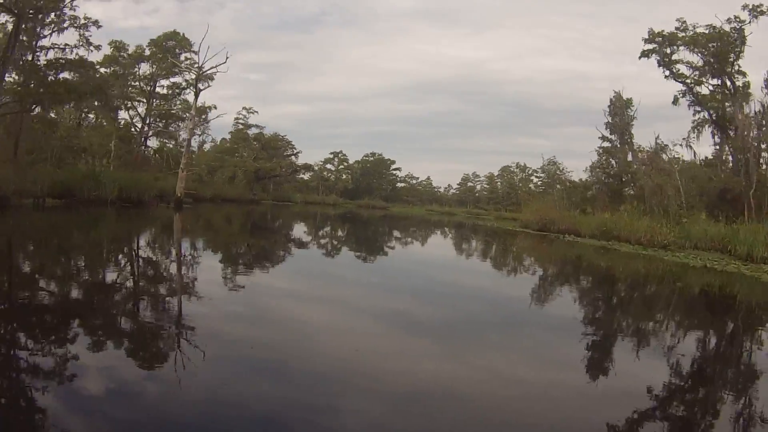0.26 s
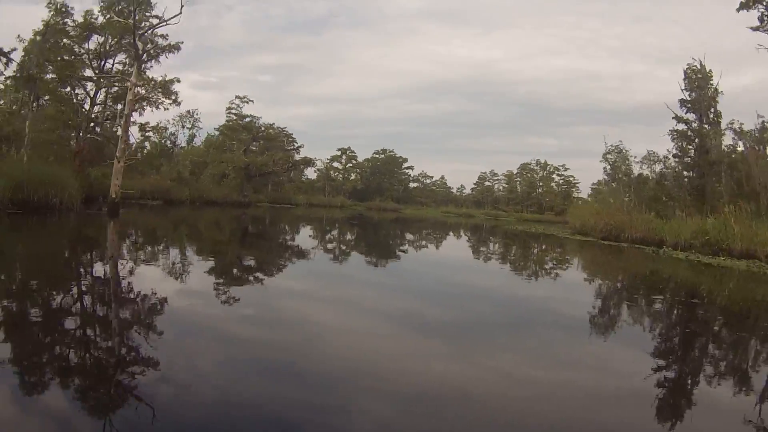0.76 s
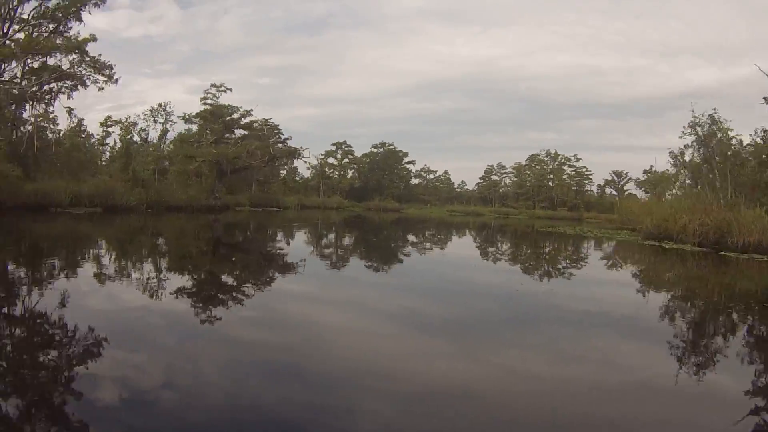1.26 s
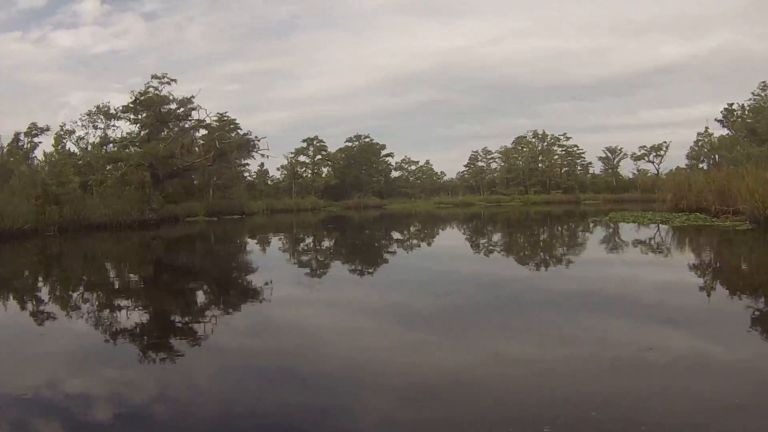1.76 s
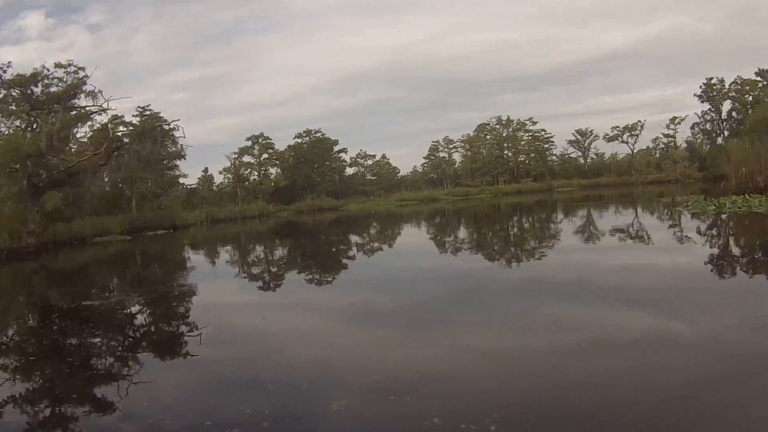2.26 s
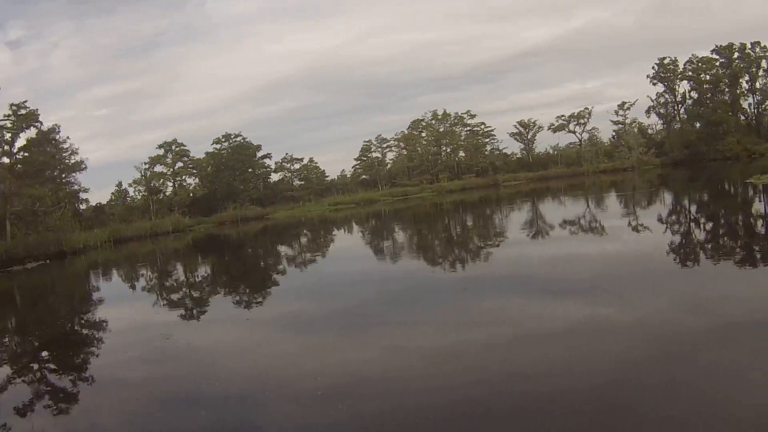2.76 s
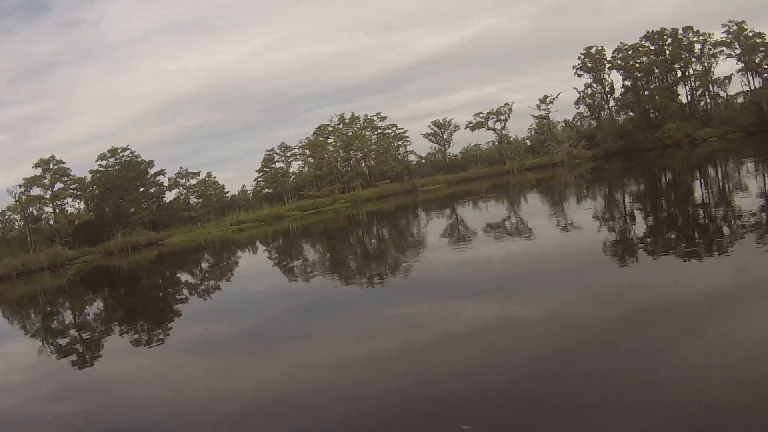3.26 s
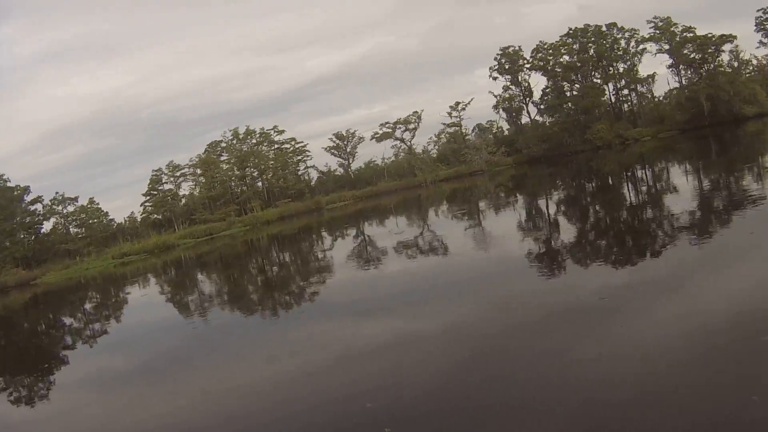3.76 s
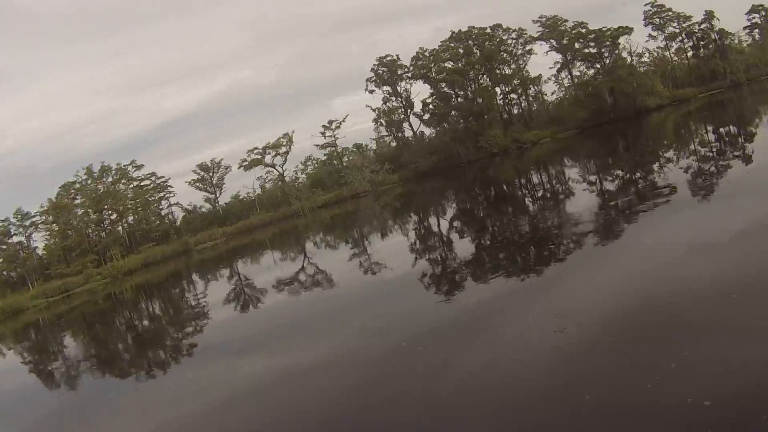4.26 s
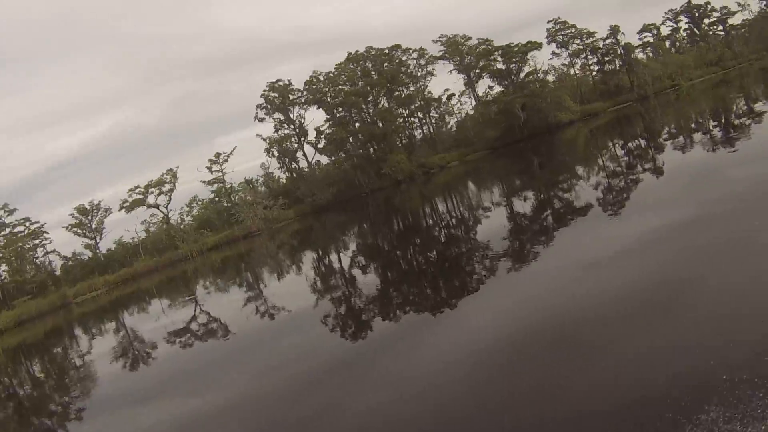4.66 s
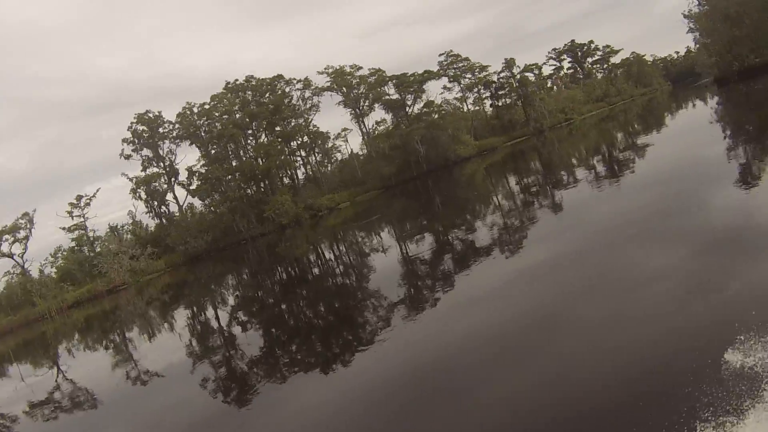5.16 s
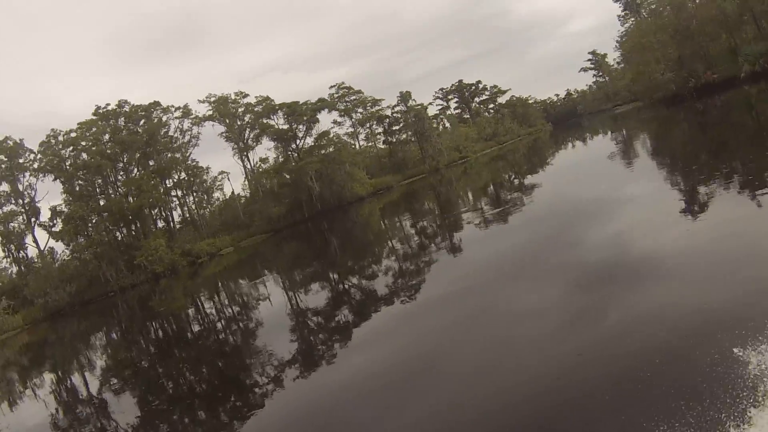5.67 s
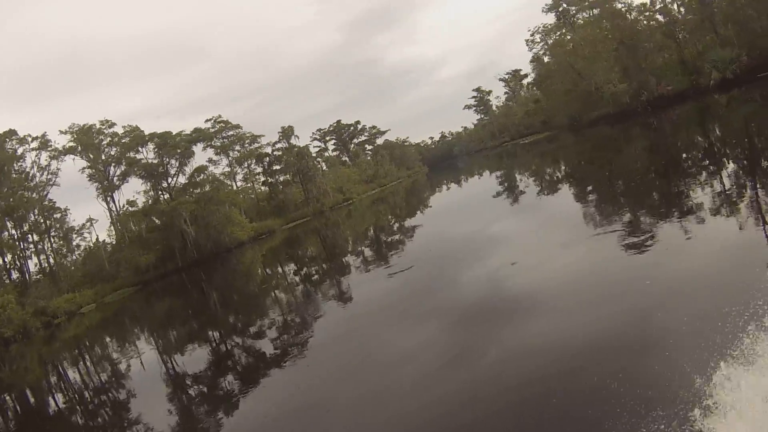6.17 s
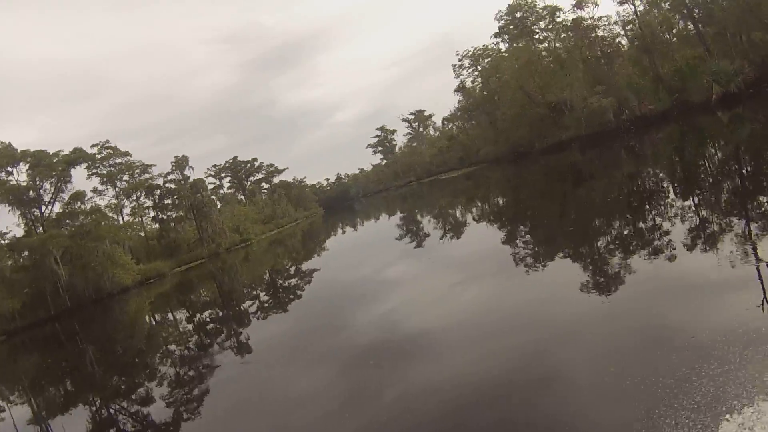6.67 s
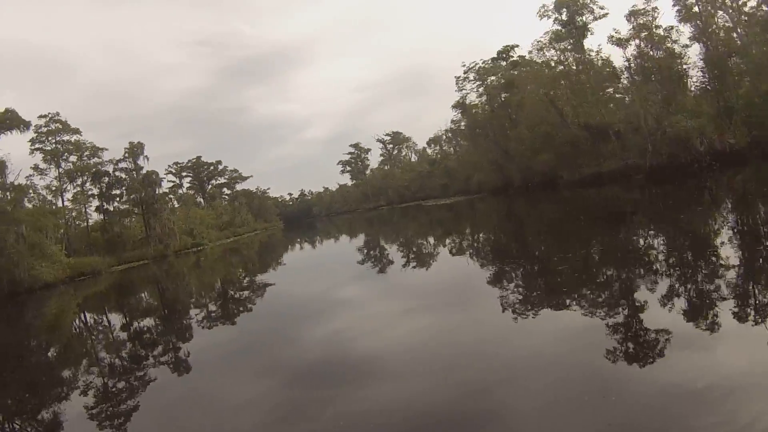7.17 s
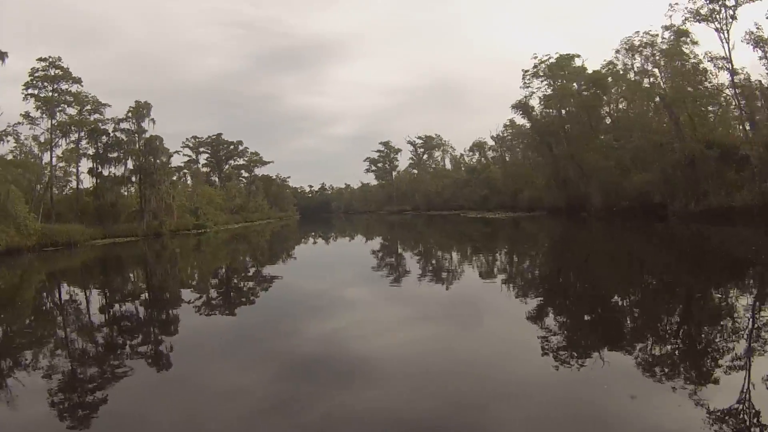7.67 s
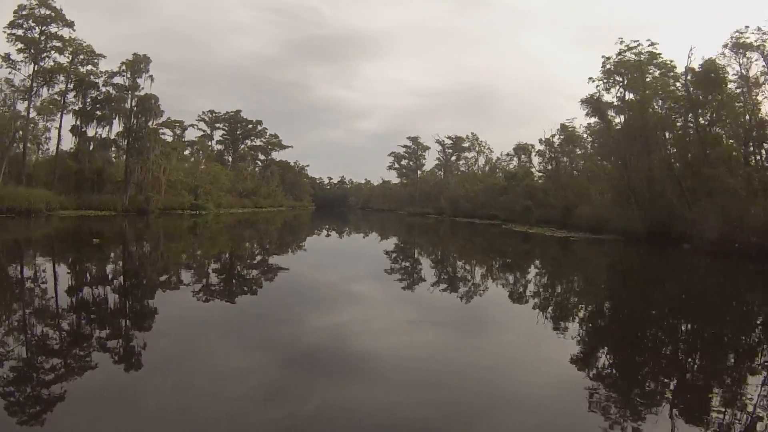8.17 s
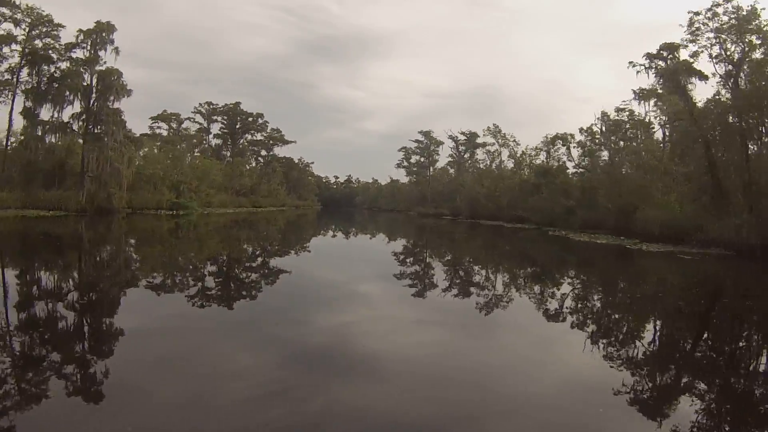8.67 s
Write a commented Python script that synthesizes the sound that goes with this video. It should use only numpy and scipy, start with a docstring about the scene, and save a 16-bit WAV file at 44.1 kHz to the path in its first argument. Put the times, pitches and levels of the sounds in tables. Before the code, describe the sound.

On board a small boat on an open, calm river, an outboard motor runs at steady throttle. A deep buzzing throb flutters briefly now and then beneath a dense midrange rattle of loose parts. Water rumbles under the hull, with small irregular bumps. Spray hisses more as the boat leans into a bend, then fades as it straightens. One close microphone on board, dry, with slightly coloured treble.

```python
"""On board a small boat on a calm river, driven by an outboard motor at steady throttle.
Tones locked to the firings make a deep throb that sags briefly now and then, with a drone of the hull.
Random clicks through resonances make a dense rattle with a few brief gaps and a thin buzz.
Shaped noise rumbles under the hull; fine clicks hiss as spray, most of all through a bend.
One microphone, whose case colours the treble, hears it all."""
import sys
import numpy as np
from scipy import signal
from scipy.fft import rfft, irfft, next_fast_len
from scipy.io import wavfile
from scipy.ndimage import uniform_filter1d, minimum_filter1d

SR = 44100
rng = np.random.default_rng(int(sys.argv[2]) if len(sys.argv) > 2 else 0)


def wav_out(sig):
    """Save sig, one row per channel (or a flat mono array), as 16-bit PCM at SR to the path in sys.argv[1]."""
    wavfile.write(sys.argv[1], SR, np.round(np.clip(np.atleast_2d(sig).T, -1, 1) * 32767).astype(np.int16))


N = 393372
TIME = np.arange(N) / SR  # s


def from_db(db):
    """Decibels to gain."""
    return 10 ** (np.asarray(db) / 20)


def rms_one(x):
    """Scale to unit rms."""
    return x / np.sqrt(np.mean(x ** 2) + 1e-20)


def in_time(rows):
    """Each column of a curve, joined by straight lines; the first column is the time in seconds."""
    s, *columns = np.transpose(rows)
    return [np.interp(TIME, s, column) for column in columns]


def bell(dt, width_s):
    """A smooth bump of height 1, this wide at half height."""
    return np.exp(-np.log(2) * np.minimum((2 * dt / width_s) ** 2, 50))


def drift(rate):
    """Slow chance with about this many turns a second; spread 1."""
    step = 40  # samples between the points of the slow noise
    settling = 2000  # points dropped while the filter settles
    r = np.exp(-2 * step * np.pi * rate / SR)
    noise = rng.standard_normal(N // step + 2 + settling)
    slow = signal.lfilter([1], [1, -2 * r, r * r], noise)[settling:]
    return np.interp(np.arange(N) / step, np.arange(len(slow)), rms_one(slow))


def coloured(x, spectrum):
    """Give a sound the colour of a spectrum table, joined by straight lines over log frequency; rms 1."""
    size = next_fast_len(N)
    hz, db = np.transpose(spectrum)
    bins = np.maximum(np.fft.rfftfreq(size, 1 / SR), 1)
    gain = from_db(np.interp(np.log(bins), np.log(hz), db))
    return rms_one(irfft(rfft(x, size) * gain, size)[:N])


def resonate(x, hz, width_hz):
    """One resonance with gain 1 on top."""
    r = np.exp(-np.pi * width_hz / SR)
    feed = np.array([1, 0, -1]) * (1 - r * r) / 2
    return signal.lfilter(feed, [1, -2 * r * np.cos(2 * np.pi * hz / SR), r * r], x)


def grains(per_s, spread_db):
    """Random clicks of uneven size and sign; rms 1."""
    sizes = from_db(spread_db * np.minimum(rng.exponential(1, N), 4))
    struck = rng.random(N) < per_s / SR
    return rms_one(struck * sizes * rng.choice([-1, 1], N))


def sag(slip_hz, lean):
    """In each sag the throb fades and slips out of step, then catches again more quickly."""
    # Placed sags of the throb, mostly deep. Each row: centre in seconds, depth from 0 to 1, width in seconds.
    placed_sags = [(0.058, .7, 0.071), (0.204, 0.3, 0.091), (0.495, 0.36, 0.12), (0.975, .6, 0.084),
                   (1.505, 0.56, 0.071), (1.663, .45, .11), (2.464, .74, .12), (2.821, 0.5, .05),
                   (3.196, 0.7, .14), (4.47, 0.9, 0.075), (4.729, .9, 0.068), (5.784, .67, 0.15),
                   (6.606, 1, .043), (7.195, 0.76, .035), (8.005, 1, 0.059), (8.134, 0.7, 0.076),
                   (8.422, 0.96, 0.041)]
    # further brief ones come by chance, one in each slot; depth and width are averages
    dips_per_s, dip_depth, dip_width_s = 4, 0.38, 0.042
    dips = []
    for slot, (when, deep, long) in enumerate(rng.random((60, 3))):
        dips.append(((slot + when) / dips_per_s, dip_depth * (.5 + deep), dip_width_s * (.5 + long)))
    gain = np.ones(N, complex)
    for s, depth, width in list(placed_sags) + dips:
        near = slice(max(int((s - 3 * width) * SR), 0), int((s + 3 * width) * SR))
        dt = TIME[near] - s
        # wider before the centre than after it
        fade = bell(dt, width * (1 - min(lean, .6) * np.sign(dt)))
        gain[near] *= 1 - min(depth, 1) * fade * np.exp(-2j * np.pi * slip_hz * dt)
    return gain


def drone_gain():
    """The hull's drone builds, slowly ebbs or grows, and drops back to its resting level."""
    # Swells added to the resting drone. Each row: full swell in seconds, release in seconds,
    # level in dB at full swell, ebb in dB per second (below zero it grows).
    swells = [(0.502, 1.97, -36, -3), (2.167, 4.15, -19.5, 4.7), (7.648, 9.0, -23.5, -5.5)]
    rest_db, rise_s, release_s = -32, 0.22, 0.11
    gain = from_db(rest_db)
    for full, release, db, ebb in swells:
        rise = 1 + (TIME - full) / rise_s
        fall = 1 - (TIME - release) / release_s
        gate = np.clip(np.minimum(rise, fall), 0, 1)
        gain = gain + gate * from_db(db - ebb * np.clip(TIME - full, 0, release - full))
    return gain


def engine(phase, load, bend, throb_rough, drone_rough, overtone_rough):
    """Tones locked to the firings; their strength wanders slowly."""
    # Firing tone. Each row: time in seconds, level in dB.
    throb_curve = [(0, -13), (1.2, -10), (2.6, -14.5), (3.7, -14.5), (4.8, -12), (6.9, -11.5), (8.9, -15)]
    # Weaker tones. Each row: multiple of the firing rate, level in dB when running straight at no load,
    # dB added by full load, dB added by full lean.
    weaker_tones = [(.5, -54.5, 7.5, 1.5), (1.5, -39, 4.5, 0.5), (2, -34, 0, 5.5), (4, -42, -3, -2.5),
                    (5, -51.5, 3.5, -1), (6, -41, 0.5, -5.5), (7, -53.5, 6, -5), (8, -46, 7, 4),
                    (9, -41.5, 3.5, -1), (11, -44.5, 3.5, -4), (12, -44, 9.5, 8)]
    firing_level, = in_time(throb_curve)
    throb = np.real(sag(slip_hz=4.6, lean=0.52) * np.exp(1j * phase)) * (1 + throb_rough * drift(5.9))
    # the drone, at three times the firing rate, opposes the throb at its crests and flattens them
    drone = -np.cos(3 * phase + drone_rough * drift(8)) * (1 + drone_rough * drift(8))
    out = from_db(firing_level) * throb + drone_gain() * drone
    for multiple, db, load_db, bend_db in weaker_tones:
        wander = 1 + overtone_rough * (drift(3.8) + 1j * drift(6))
        turning = np.exp(1j * (multiple * phase + 2 * np.pi * rng.random()))
        out += from_db(db + load_db * load + bend_db * bend) * np.real(wander * turning)
    return np.sqrt(2) * out  # a steady tone's level is then its rms


def ripples():
    """dB of surge as the water shakes the hull harder: single ripples on a light chop."""
    # Ripples met by the hull. Each row: peak in seconds, surge in dB, length in seconds at half height.
    ripples_met = [(0.583, 7.5, 0.098), (1.024, 6.5, 0.025), (1.62, 4, 0.25), (2.17, 4.5, 0.15),
                   (3.34, 5, 0.23), (4.113, 5, 0.064), (4.58, 4, 0.14), (4.862, 3.5, 0.22),
                   (5.825, 5.5, 0.033), (6.217, 2.5, .18), (6.64, 2.8, 0.096), (6.937, 3, 0.12),
                   (7.485, 4, 0.023), (8.16, 5.5, 0.027), (8.424, 3.1, .04), (8.724, 5, 0.085)]
    chop_db, chop_per_s = 1.5, 7.5  # smaller ripples come by chance
    single = sum(db * bell(TIME - s, length) for s, db, length in ripples_met)
    return single + chop_db * drift(chop_per_s)


def gaps(flight_s, flight_db, settle_s):
    """dB added to the rattle: the parts lift off for an instant, return stronger or softer, then even out."""
    # Brief gaps in the rattle. Each row: return in seconds, dB added at the return (below zero softer).
    returns = [(0.883, 0.5), (0.99, 7), (1.378, 1.5), (1.421, 3.5), (1.473, -1.5), (4.181, -1), (4.753, 4),
               (8.146, 2), (8.412, 0.5), (8.707, 2)]
    out = np.zeros(N)
    for s, db in returns:
        dt = TIME - s
        out += flight_db * ((dt > -flight_s) & (dt < 0))
        out += db * (dt >= 0) * np.exp(-np.abs(dt) / settle_s)
    return out


def buzz(phase, in_step, fade_s):
    """Tiny parts tick, a little more on every firing, and ring high; each comes loose, then seats again."""
    # Loose parts. Each row: start in seconds, end in seconds, resonance in Hz,
    # width in Hz of each of two passes, level in dB relative to the rattle.
    loose_parts = [(-.5, 1.2, 6500, 500, -38), (.6, 1.85, 6830, 260, -42), (7.85, 9.4, 5560, 320, -45)]
    out = np.zeros(N)
    for start, end, hz, width, db in loose_parts:
        loose = np.clip(np.minimum(TIME - start, end - TIME) / fade_s, 0, 1)
        ticks = grains(4000, spread_db=-4.5) * (1 + in_step * np.cos(phase))
        ringing = rms_one(resonate(resonate(ticks, hz, width), hz, width))
        out += from_db(db) * loose * ringing
    return out


def rattle(phase, shake_db, contacts_per_s, in_step, flutter_db, ring_db, clatter_db, fizz_db):
    """Loose parts chatter, a little more on each firing: a ringing body and a dry, bright clatter."""
    # Resonances of the parts. Each row: centre in Hz, width in Hz of each of two passes, relative dB.
    part_modes = [(489, 76, -18), (612.5, 54, -9), (690, 59, -5.5), (769.7, 56, 1), (819, 59, 0.5),
                  (878, 70, -1), (970.7, 119, 3), (1034.7, 59, 0.5), (1102, 69, -2), (1374, 135, -12),
                  (1580, 280, -16.5), (1888, 230, -18), (2214, 350, -27.5)]
    # Colours of the clatter and of the fizz above it. Each row: frequency in Hz, relative dB per Hz.
    clatter_colour = [(300, 1.5), (700, 0), (1100, -4), (1230, -2), (1400, 0), (1800, -2.5), (2500, -9),
                      (3150, -8), (3900, -15), (4400, -25.5), (6500, -30), (9000, -38), (12000, -51.5),
                      (15000, -55.5)]
    fizz_colour = [(4000, -19.5), (8000, -3), (11000, 2.5), (12100, -9), (12900, 0), (13900, -6.5),
                   (15000, -14.5)]
    base_db = -24.5  # at light load
    uneven_db = flutter_db * drift(44) + gaps(flight_s=0.0091, flight_db=-5.0, settle_s=0.0083)
    force = from_db(uneven_db) * (1 + in_step * np.cos(phase))
    ring = np.zeros(N)
    # each resonance acts twice, which keeps the valleys between them dark
    for hz, width, db in part_modes:
        contacts = force * grains(contacts_per_s, spread_db=1.5)
        ring += from_db(db) * resonate(resonate(contacts, hz, width), hz, width)
    ringing = from_db(ring_db) * rms_one(ring) + buzz(phase, in_step=0.23, fade_s=0.28)
    clatter = coloured(force * grains(9000, spread_db=2.0), clatter_colour)
    # a faint fizz at the top of the treble, brightest in the loudest rattle
    fizz = coloured(force * grains(2500, spread_db=4.5), fizz_colour)
    out = from_db(shake_db) * ringing
    out += from_db(clatter_db + 0.61 * shake_db) * clatter
    out += from_db(fizz_db + 1.8 * shake_db) * fizz
    return from_db(base_db) * out


def water(phase, load, bend, surge_db, patchy_db, in_step):
    """The hull rumbles over the water and throws droplets and a fine mist in uneven spurts."""
    # Colours of rumble, droplets and mist. Each row: frequency in Hz, relative dB per Hz.
    rumble_colour = [(20, -23.5), (45, -11.5), (70, 9), (100, 8), (135, 1), (185, -3), (240, 4),
                     (275, -2.5), (310, -13.5), (420, -17.5), (600, -24), (1200, -19), (2500, -62)]
    spray_colour = [(600, -7), (1600, -5.5), (2550, -14), (3150, 5), (3500, -1), (3780, 4), (4000, -3),
                    (4350, -16), (5200, -20), (6500, -22.5), (9000, -33), (12000, -46.5), (15000, -63)]
    mist_colour = [(3000, -31.5), (5000, -2), (6400, 2), (8200, -1), (9300, -10), (10900, -8),
                   (11700, -17.5), (15000, -33.5)]
    # Finest mist of the spray. Each row: time in seconds, level in dB.
    mist_curve = [(0, -60.5), (2.5, -58), (4.6, -55), (7.5, -70), (8.9, -65)]
    rumble_base_db, rumble_load_db = -25.5, 1.6  # at light load, and what full load adds
    spray_base_db, spray_bend_db = -47, 13.5  # on a straight course, and what the full lean adds
    rumble_follows, spray_follows, mist_follows = .7, 0.76, .6  # dB per dB of surge
    mist_level, = in_time(mist_curve)
    rumble_db = rumble_base_db + rumble_load_db * load + rumble_follows * surge_db
    spray_db = spray_base_db + spray_bend_db * bend + spray_follows * surge_db
    mist_db = mist_level + mist_follows * surge_db
    rumble = from_db(rumble_db) * coloured(rng.standard_normal(N), rumble_colour)
    spray = from_db(spray_db) * coloured(grains(14000, spread_db=2.0), spray_colour)
    mist = from_db(mist_db) * coloured(grains(12000, spread_db=3.5), mist_colour)
    # the hull shivers with the engine, so the spray pulses faintly
    shiver = 1 + in_step * np.cos(phase)
    return rumble + (spray + mist) * from_db(patchy_db * drift(2.1)) * shiver


def scene():
    """Engine, rattle and water at one microphone on board."""
    # Engine speed. Each row: time in seconds, firings per second.
    speed_curve = [(0.1, 85.0), (0.5, 83.7), (2.2, 83.8), (2.9, 84.5), (3.3, 85.6), (5.2, 85.8),
                   (6.1, 86.4), (7.0, 87.1), (7.6, 86.7), (8.0, 85.7)]
    # Load on the boat, which steps up in the bend. Each row: time in seconds, share from 0 to 1.
    load_curve = [(0, 0.37), (1.3, 0.13), (3.9, 0), (4.55, 0.83), (5.3, 0.93), (6.5, 0.79), (8.9, 0.94)]
    # How far the boat leans into the bend. Each row: time in seconds, share from 0 to 1.
    bend_curve = [(0, 0.05), (1.4, 0.1), (3.1, 0.73), (4.6, 0.95), (5.4, .76), (7.0, 0.52), (7.9, 0.18),
                  (8.9, 0)]
    rattle_load_db, rattle_follows = 3.5, 0.83  # dB added by full load, dB per dB of surge
    firings_per_s, = in_time(speed_curve)
    load, = in_time(load_curve)
    bend, = in_time(bend_curve)
    surge_db = ripples()
    # the firing rate wavers slightly
    phase = 2 * np.pi * np.cumsum(firings_per_s * (1 + .002 * drift(7))) / SR
    tones = engine(phase, load, bend, throb_rough=0.027, drone_rough=0.21, overtone_rough=0.22)
    shake_db = rattle_load_db * load + rattle_follows * surge_db
    shaken = rattle(phase, shake_db, contacts_per_s=3500, in_step=0.12, flutter_db=0.3,
                    ring_db=-1.65, clatter_db=-10.0, fizz_db=-55.5)
    wet = water(phase, load, bend, surge_db, patchy_db=0.65, in_step=0.033)
    return (tones + shaken + wet)[None]


def limiter(x, top):
    """The gain ducks smoothly around every peak that would pass the top."""
    size = SR // 250  # 4 ms
    gain = minimum_filter1d(np.minimum(1, top / (np.abs(x) + 1e-9)), 2 * size)
    return x * uniform_filter1d(uniform_filter1d(gain, size), size)


def record(dry):
    """The microphone's case colours the treble, peaks are held down, the top is cut."""
    # Resonances of the case. Each row: centre in Hz, width in Hz, boost in dB (below zero a dip).
    case_modes = [(4420, 140, 3.5), (5170, 450, -3), (5630, 400, 4), (5940, 180, -1.5), (7330, 570, -9.5),
                  (8230, 800, 2.5), (9400, 900, -3.5), (10750, 700, 3.5)]
    cutoff_hz = 15400
    for hz, width, db in case_modes:
        dry = dry + (from_db(db) - 1) * resonate(dry, hz, width)
    held = limiter(dry, top=.75)
    return signal.sosfilt(signal.cheby2(14, 60, cutoff_hz, fs=SR, output="sos"), held)


dry = scene()
out = record(dry)
wav_out(out)
```